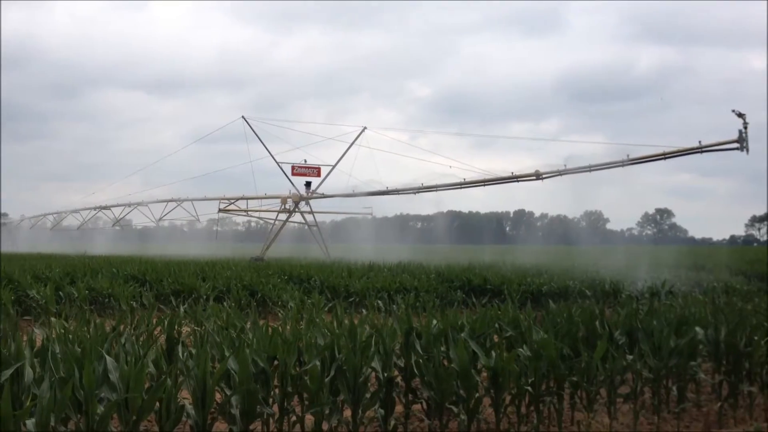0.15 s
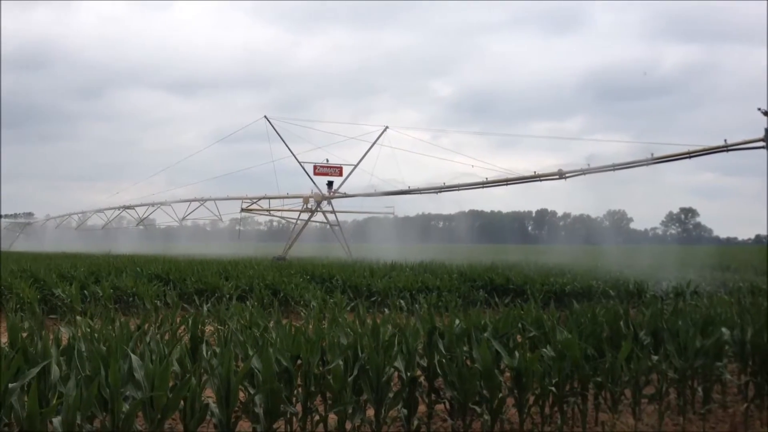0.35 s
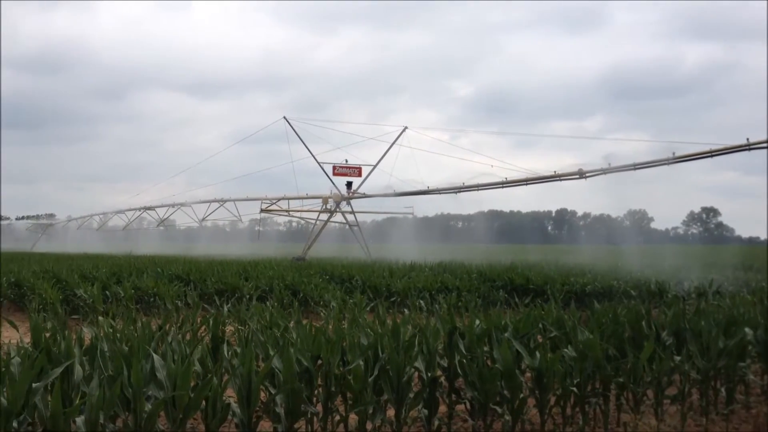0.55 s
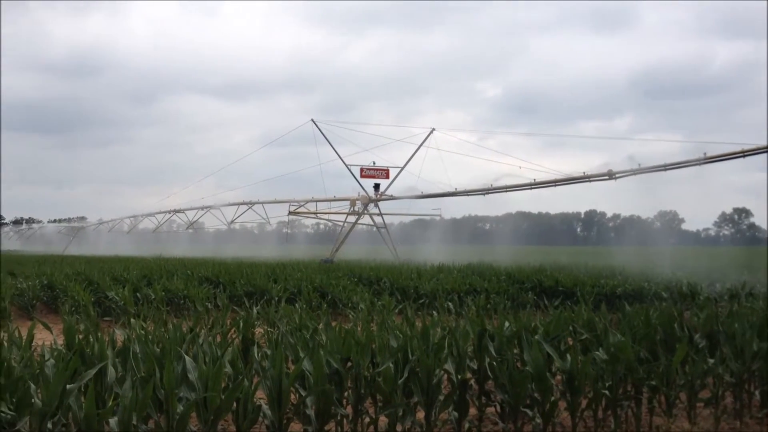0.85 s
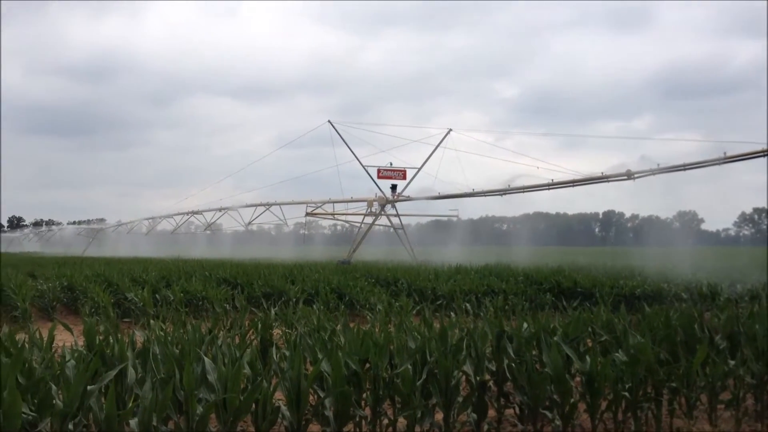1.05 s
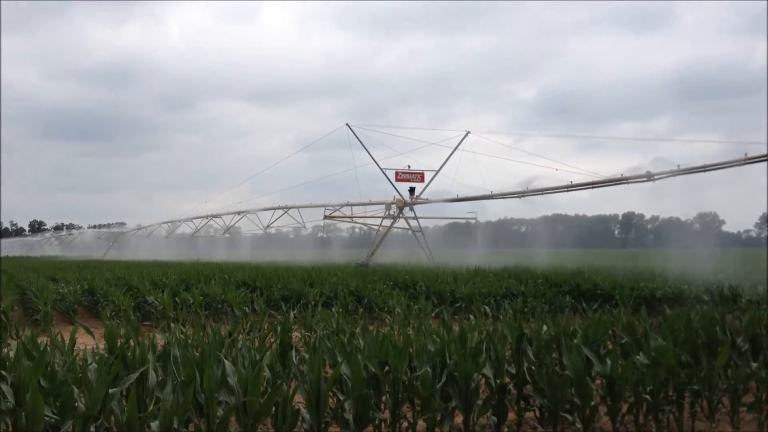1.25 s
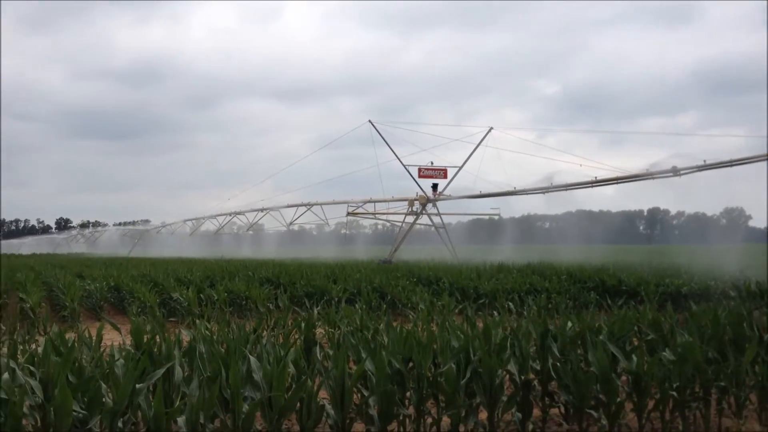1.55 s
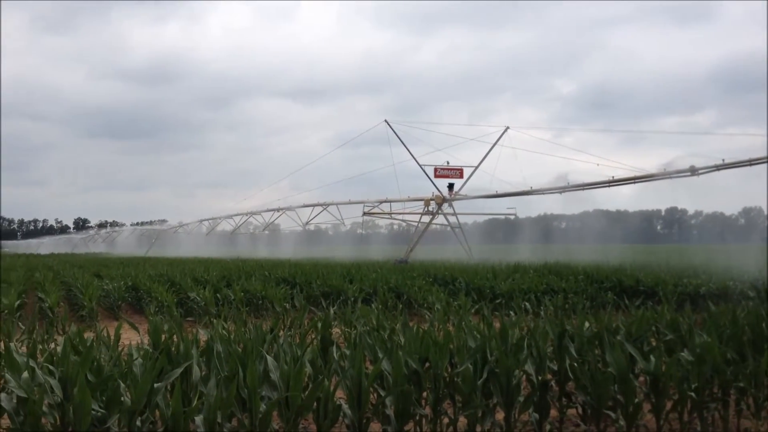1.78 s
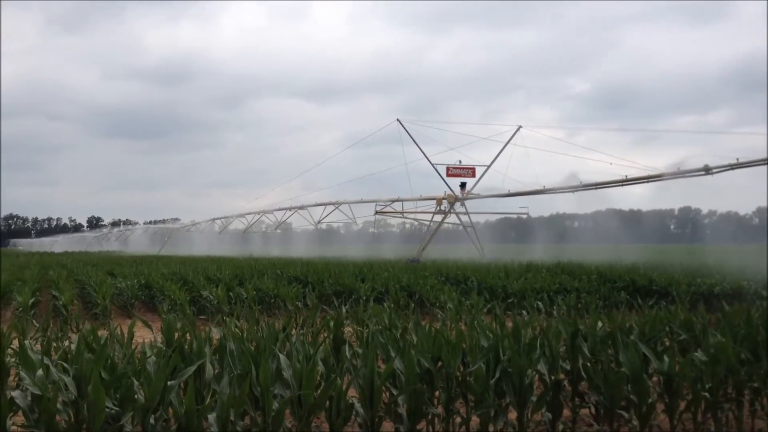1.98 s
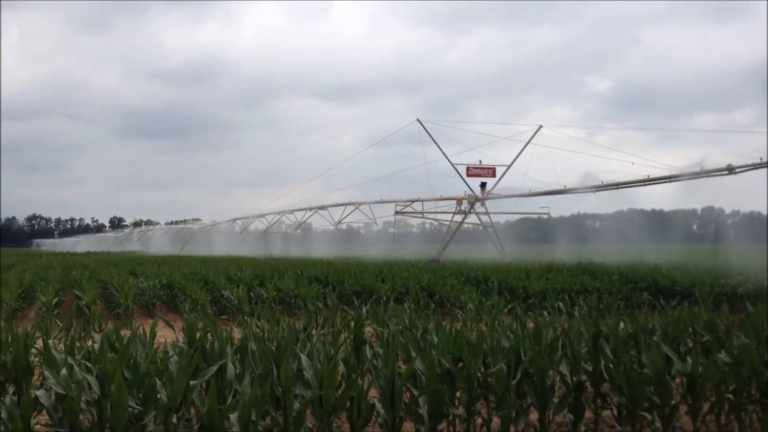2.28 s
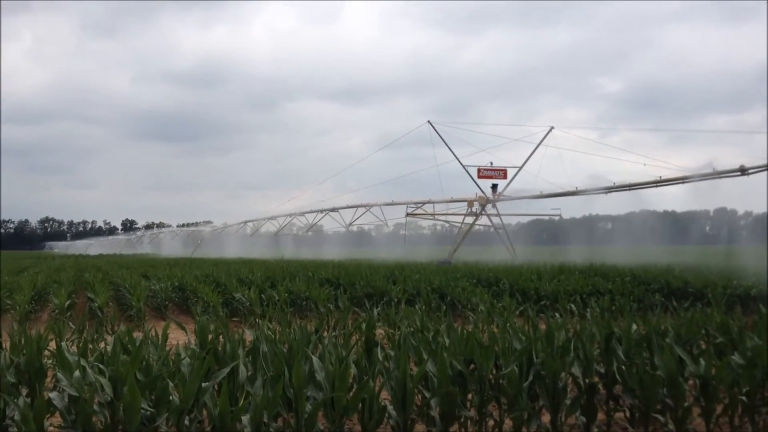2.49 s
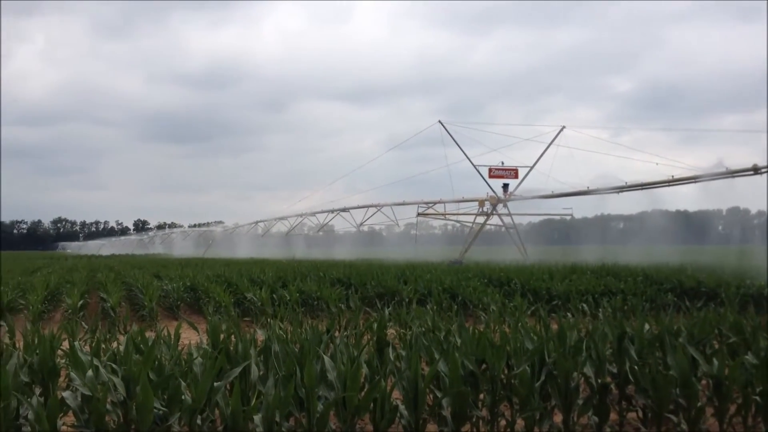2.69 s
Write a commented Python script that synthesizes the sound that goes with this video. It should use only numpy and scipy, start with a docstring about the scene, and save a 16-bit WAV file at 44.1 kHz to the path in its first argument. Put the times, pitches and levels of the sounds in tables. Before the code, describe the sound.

Steady water spray hissing from a long irrigation boom over a leafy crop field outdoors

```python
"""Irrigation boom over maize

Maize field, hand-held camera with a mono microphone, a long spray boom some tens of metres off.
Random clicks of drops on leaves fuse with noise for the nozzle hiss; its colour shifts as the camera turns.
Underneath, filtered noise makes a low distant rumble and a few wavering hums; two brief soft tones
are rising sines."""
import sys
import numpy as np
from scipy import signal
from scipy.fft import rfft, irfft
from scipy.io import wavfile
from scipy.ndimage import uniform_filter1d, map_coordinates

SR = 44100
rng = np.random.default_rng(int(sys.argv[2]) if len(sys.argv) > 2 else 0)


def makeup_ratio(level_db):
    """Linear amplitude ratio for a level in decibels (20 dB per factor of ten)."""
    decades = np.asarray(level_db, float) / 20
    return 10 ** decades


def waveform_to_disk(signal):
    """Save audio, clipped to [-1, 1], as 16-bit WAV at the path in sys.argv[1]."""
    frames = np.transpose(np.atleast_2d(signal))
    scaled = np.clip(frames, -1, 1) * 32767
    samples = np.round(scaled).astype(np.int16)
    wavfile.write(sys.argv[1], SR, samples)


N = 124803  # samples

# Distant rumble, relative spectrum: frequency_hz, density_db
RUMBLE_COLOUR = [(15, -54), (25, -29), (59, -25.5), (125, -7.5), (171, -2), (220, -5), (264, -4),
                 (329, -11), (450, -8.5), (580, -66), (990, -120)]
# Wavering hums, perhaps a far pump: centre_hz, width_hz (at half amplitude), rms_db (before fades), start_s, end_s
HUMS = [(90, 8.1, -88, -0.2, 3.0), (140.3, 15, -75.5, 1.4, 2.6), (171, 8.6, -72, 0.23, 2.55),
        (268, 7.1, -68.5, 0.02, 0.53)]
# Brief soft tones, perhaps drips nearby: centre_s, pitch_hz (at the centre), peak_db, length_s (centre to 1/e)
DRIPS = [(0.893, 815, -55, 0.016), (2.80, 1010, -61, 0.03)]
# Spray with the camera facing the boom's end, relative spectrum: frequency_hz, density_db
FACING_COLOUR = [(180, -21), (300, -13), (384, -15.5), (570, -10.5), (706, -9), (766, -7), (1050, -13.5),
                 (1250, -10.5), (1770, -9.5), (1920, -6.5), (2160, -10), (2380, -8), (3370, -18.5),
                 (4030, -14), (4380, -9), (4750, -7), (5160, -0.5), (5980, -3.5), (6290, -7.5), (7410, -8),
                 (8740, -17.5), (10800, -10.5), (12300, -15.5), (14300, -12.5), (15300, -14)]
# Spray after the camera has turned away, relative spectrum: frequency_hz, density_db
TURNED_COLOUR = [(180, -45), (300, -13), (342, -8.5), (397, -10), (533, -9), (579, -12.5), (639, -4.5),
                 (792, -4), (1060, -8), (1170, -6.5), (1580, -4.5), (1830, -4), (2230, -4), (2540, -4.5),
                 (3200, -12), (4170, -7), (4750, -3), (5420, 0), (5980, -5.5), (7660, -6.5), (9640, -12.5),
                 (13000, -10), (15300, -11.5)]
# Narrow ridges and dips in the spray's colour: centre_hz, width_hz (two standard deviations), facing_db, turned_db
SPRAY_RIDGES = [(4490, 98, 2, 2), (4750, 340, 0.5, 2.5), (5350, 250, 2, -1.5), (5480, 220, -2, 5.5),
                (5680, 140, -4.5, -2), (5930, 260, 0, 1), (7700, 200, 0.5, 2.5), (9080, 370, -2.0, -5)]
# Camera turn along the boom: time_s, turned_share (0 to 1)
CAMERA_TURN = [(0, 0.0), (0.4, 0.2), (0.8, 0.17), (1.2, 0.36), (1.55, 0.33), (1.7, 0.2), (1.9, 0.7),
               (2.1, 0.75), (2.3, 0.7), (2.55, 0.83), (2.83, 1.0)]
# Loudness of the spray as the breeze carries it: time_s, level_db
SPRAY_LEVEL = [(0.0, -46.5), (1.75, -47), (1.83, -48), (2.83, -48.5)]


def level(x, db):
    """Scale to an rms level in dB."""
    return x * makeup_ratio(db) / np.sqrt(np.mean(x ** 2))


def seconds():
    """Time of every sample."""
    return np.arange(N) / SR


def bins_hz():
    """Frequency of every bin of the whole-length spectrum."""
    return np.arange(N // 2 + 1) * SR / N


def curve(table):
    """Straight lines between rows of time_s and value."""
    return np.interp(seconds(), *np.array(table).T)


def colour(x, table):
    """Filter by frequency_hz and density_db points joined on a log-frequency axis."""
    hz, db = np.array(table).T
    gain_db = np.interp(np.log(bins_hz() + 1), np.log(hz), db)
    return irfft(rfft(x) * makeup_ratio(gain_db), N)


def walk(rate):
    """Random levels held 1 / rate seconds and smoothed twice; spread near 1."""
    hold = int(SR / rate)
    steps = np.repeat(rng.standard_normal(400), hold)
    smooth = uniform_filter1d(uniform_filter1d(steps, hold), hold)
    return 1.56 * smooth[:N]


def rumble():
    """Dull far noise, shaped by a low-frequency spectrum."""
    return level(colour(rng.standard_normal(N), RUMBLE_COLOUR), -65.5)


def hums():
    """Narrow resonances of noise waver by themselves, fading in and out as hums."""
    fade_s = 0.22
    t, f = seconds(), bins_hz()
    out = np.zeros(N)
    for centre_hz, width_hz, rms_db, start_s, end_s in HUMS:
        resonance = 1 / (1 + (2 * (f - centre_hz) / width_hz) ** 2)
        hum = irfft(rfft(rng.standard_normal(N)) * resonance, N)
        fade = np.clip(np.minimum(t - start_s, end_s - t) / fade_s, 0, 1)
        out += level(hum, rms_db) * fade
    return out


def drips():
    """Short sine tones under a bell-shaped envelope, rising a little in pitch."""
    out = np.zeros(N)
    for centre_s, pitch_hz, peak_db, length_s in DRIPS:
        t = seconds() - centre_s
        envelope = np.exp(-(t / length_s) ** 2)
        tone = np.sin(2 * np.pi * pitch_hz * t * (1 + 1.2 * t))
        out += makeup_ratio(peak_db) * envelope * tone
    return out


def hiss_and_patter():
    """Dense random clicks of drops of scattered size on leaves, over smooth nozzle hiss."""
    drops_per_s, size_spread_db = 9000, 3.0
    patter_db = -10  # relative to the hiss
    hit = rng.random(N) < drops_per_s / SR
    size = makeup_ratio(size_spread_db * rng.standard_normal(N))
    drops = hit * size * rng.choice([-1, 1], N)
    hiss = rng.standard_normal(N)
    return hiss + level(drops, patter_db)


def flicker(x):
    """Overlapping third-octave bands flicker alone, with a minute swell common to all."""
    swell_db, swell_per_s = -0.01, 13
    flicker_db, flicker_per_s = 0.62, 18
    spectrum = rfft(x)
    third_octave = 3 * np.log2(bins_hz() / 200 + 1e-9)  # band 0 is centred on 200 Hz
    swell = swell_db * walk(swell_per_s)
    out = np.zeros(N)
    for k in range(21):
        weight = np.clip(1 - abs(third_octave - k), 0, 1)
        band = irfft(spectrum * weight, N)
        out += band * makeup_ratio(swell + flicker_db * walk(flicker_per_s))
    return out


def patchy(x):
    """Thin bands fade and return at random, more so towards the top."""
    spread_db, half_depth_hz = 2, 5000  # half of the spread is reached at half_depth_hz
    patch_hz, patch_s = 90.5, 0.07
    f, t, z = signal.stft(x, SR, nperseg=2048, noverlap=1536)
    places = np.meshgrid(f / patch_hz, t / patch_s, indexing="ij")
    field = map_coordinates(rng.standard_normal((800, 200)), places, mode="wrap")
    depth_db = spread_db / (1 + (half_depth_hz / (f[:, None] + 1)) ** 2)
    return signal.istft(z * makeup_ratio(depth_db * field), SR, nperseg=2048, noverlap=1536)[1][:N]


def ridged(x, column):
    """Bell-shaped lifts and cuts in the spray's colour, from one level column of the ridge table."""
    gain_db = np.zeros(N // 2 + 1)
    for row in SPRAY_RIDGES:
        centre_hz, width_hz = row[:2]
        gain_db += row[column] * np.exp(-2 * ((bins_hz() - centre_hz) / width_hz) ** 2)
    return irfft(rfft(x) * makeup_ratio(gain_db), N)


def spray():
    """One stream of hiss and drops crossfades between two colours as the camera turns."""
    raw = patchy(flicker(hiss_and_patter()))
    facing = level(ridged(colour(raw, FACING_COLOUR), column=2), 0)
    turned = level(ridged(colour(raw, TURNED_COLOUR), column=3), 0)
    turn = np.clip(curve(CAMERA_TURN), 0, 1)
    return ((1 - turn) * facing + turn * turned) * makeup_ratio(curve(SPRAY_LEVEL))


def scene():
    """One mono microphone feeds both channels."""
    mono = rumble() + hums() + drips() + spray()
    return np.array([mono, mono])


def band_limit(x):
    """A steep low-pass at the top of the band."""
    return signal.sosfilt(signal.butter(12, 15300, fs=SR, output="sos"), x)


def record(dry):
    """The camera takes the finished mix as it stands."""
    return band_limit(dry)


dry = scene()
out = record(dry)
waveform_to_disk(out)
```